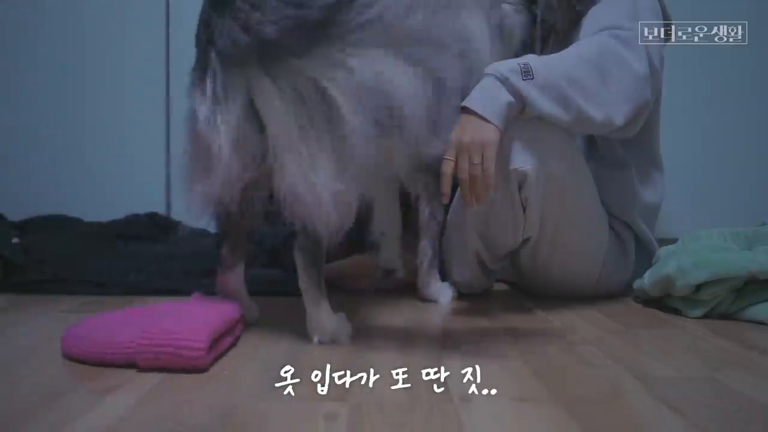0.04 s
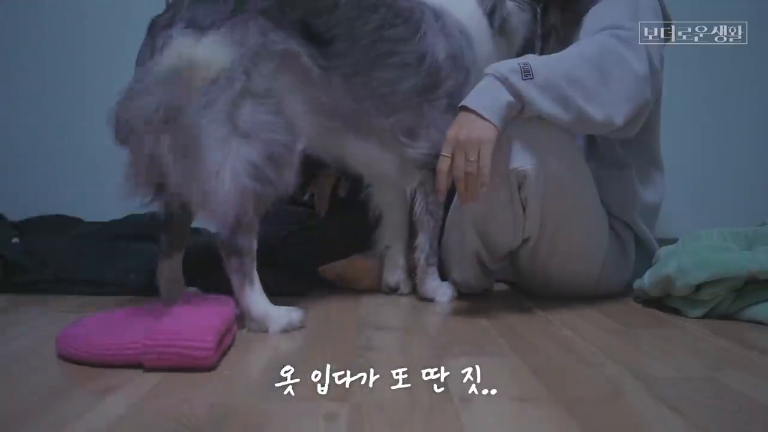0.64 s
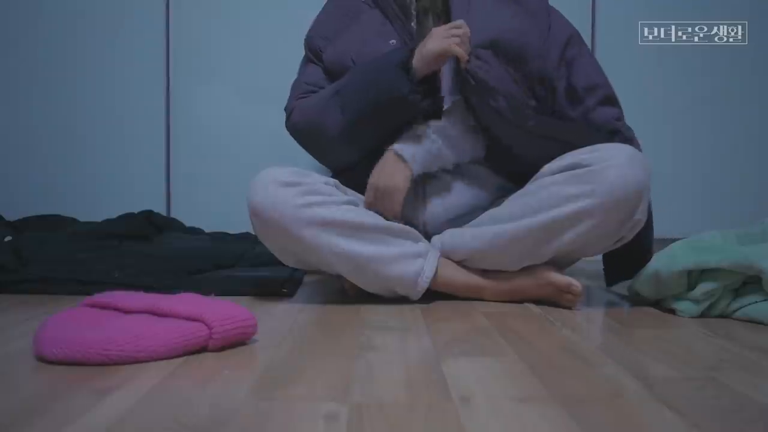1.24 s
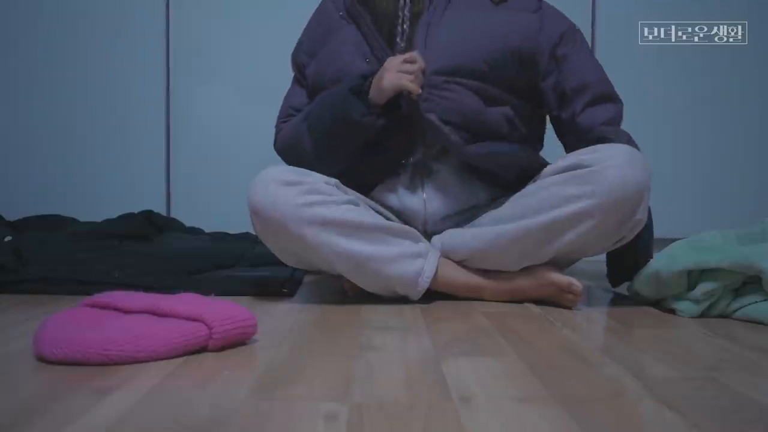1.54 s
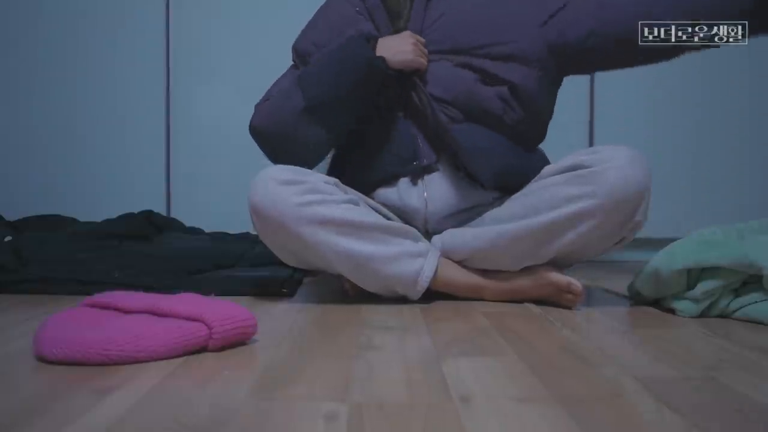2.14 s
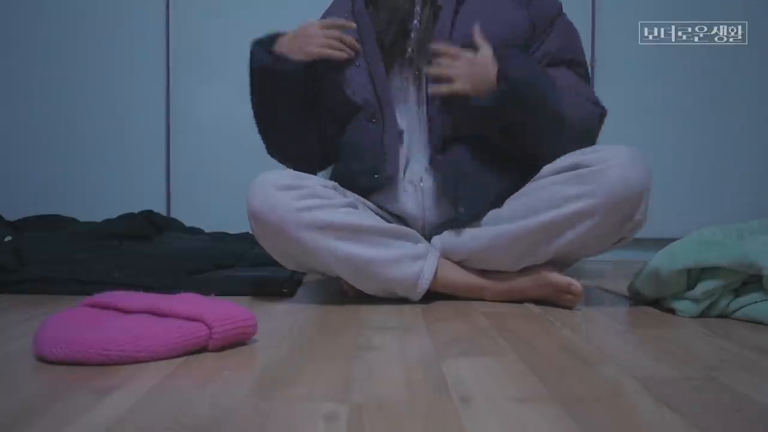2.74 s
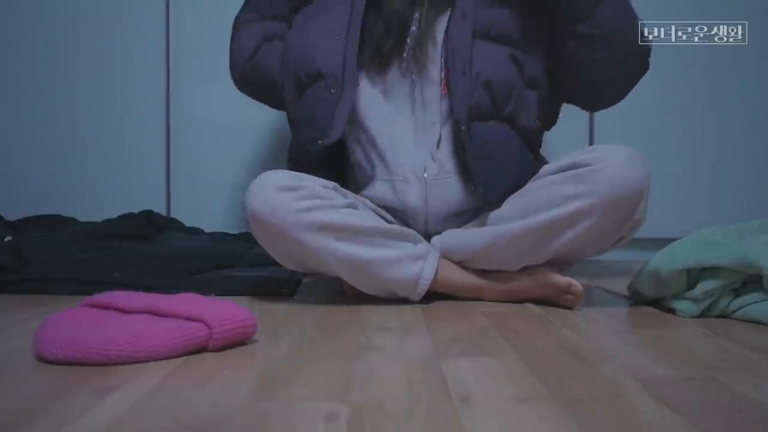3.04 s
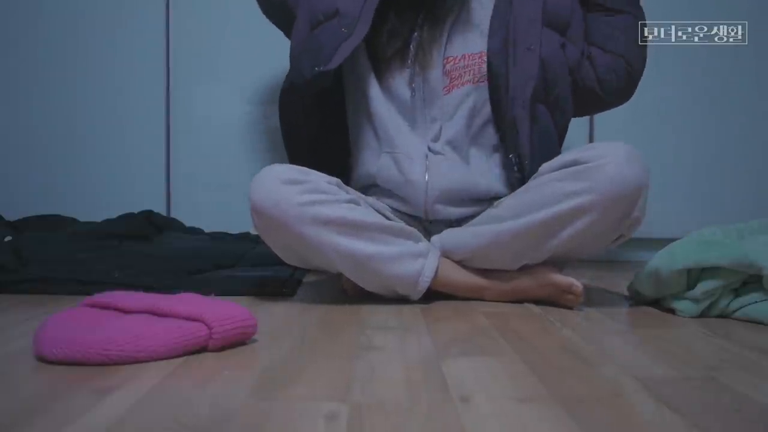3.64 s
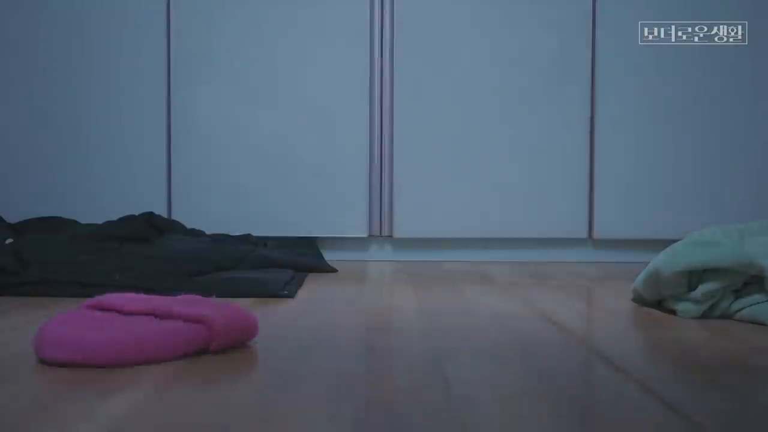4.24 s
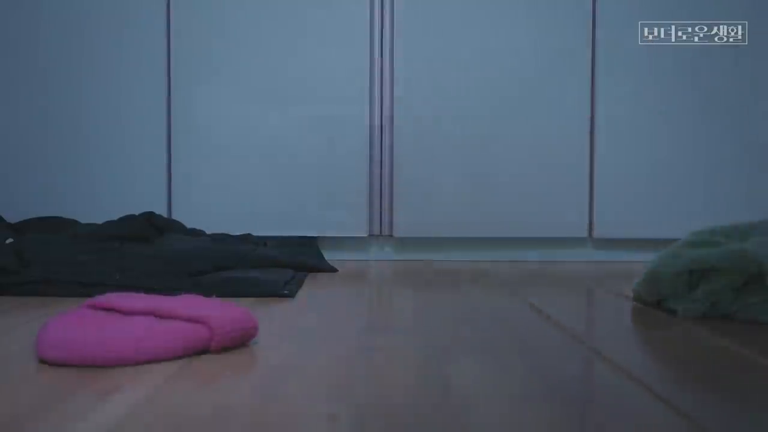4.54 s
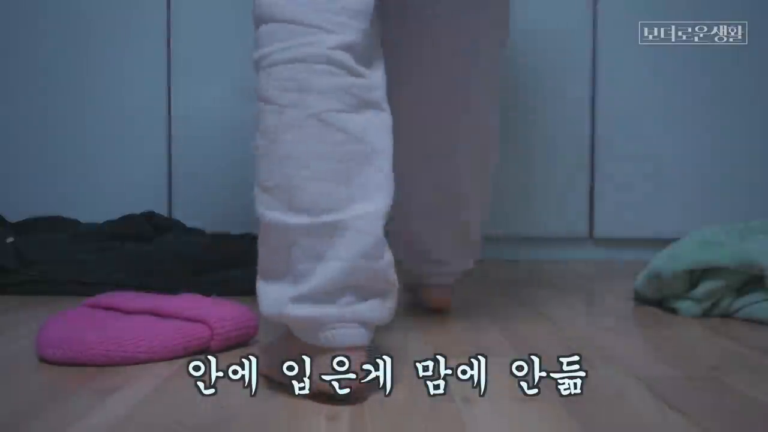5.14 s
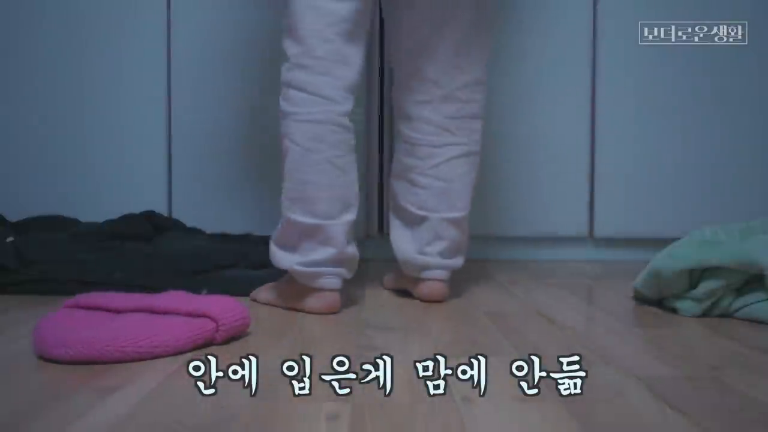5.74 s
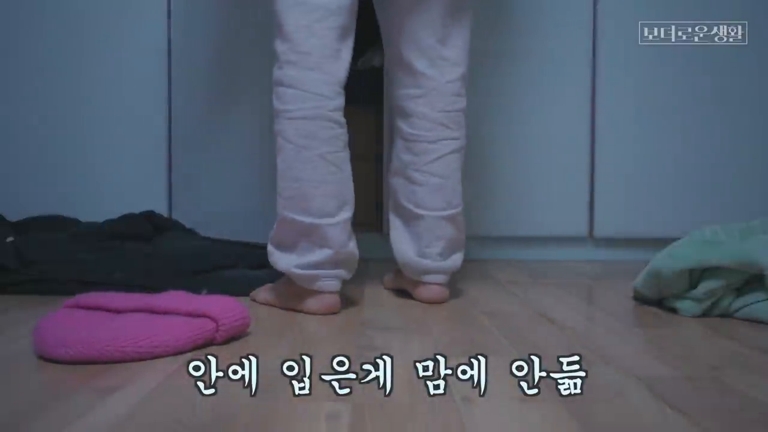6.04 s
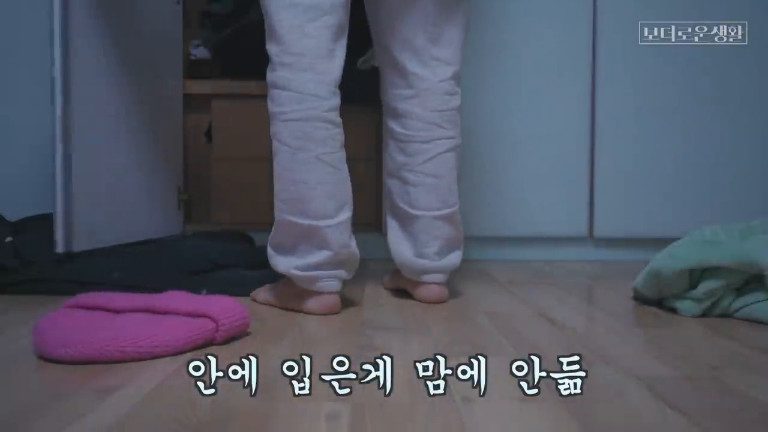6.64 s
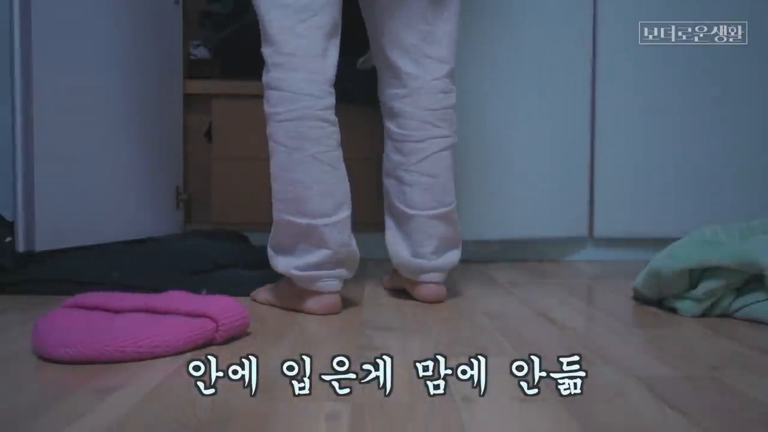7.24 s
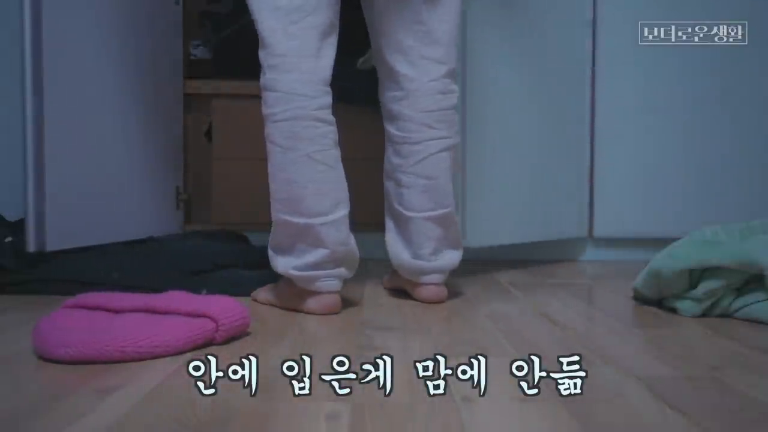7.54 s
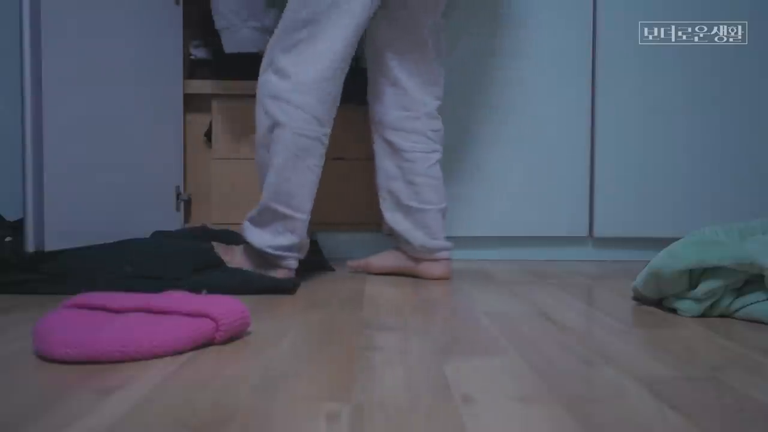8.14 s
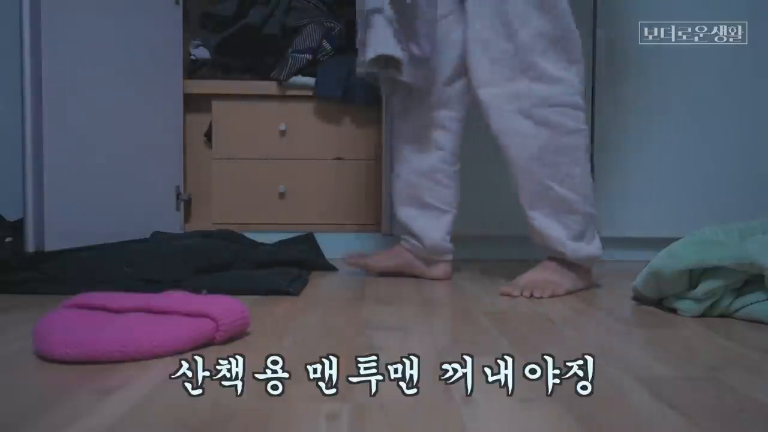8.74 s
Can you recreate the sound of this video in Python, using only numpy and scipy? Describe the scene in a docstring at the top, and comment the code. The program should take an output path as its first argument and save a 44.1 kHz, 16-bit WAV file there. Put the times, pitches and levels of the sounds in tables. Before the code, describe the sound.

For the first second, a dog's claws tick on a wooden floor, two clicks standing out sharply over faint paw bumps. At about 1.1 seconds the sound cuts to someone pulling on a padded nylon jacket close by: repeated hissing swishes with a thin, zippy edge, crumpling folds and soft puffs of padding, easing off after 3 seconds. From about 4.3 to 5.5 seconds bare feet pass the microphone, with dull bumps, a couple of heel knocks on the boards and small clicks amid the rustle. Softer strokes of cloth continue from 6 to 7.5 seconds as the person reaches into a wardrobe. Around 7.8 seconds louder rummaging begins, peaking near 8.3 seconds, with light wooden knocks, snapping fabric and a click near 8.6 seconds. The small bedroom adds a short echo, with faint room tone underneath.

```python
"""A dog's claws tick on a wooden floor in a small bedroom, over soft bumps of its paws. Then someone
pulls on a padded nylon jacket, walks past the microphone to a wardrobe and takes clothes out, each moment
cutting abruptly to the next. The nylon hisses and sings as it rubs, its folds crumple and snap, and the
padding puffs. Bare feet bump, wood knocks, and the walls add a short echo over faint room tone."""
import sys
import numpy as np
from scipy import signal
from scipy.fft import rfft, irfft
from scipy.io import wavfile
from scipy.ndimage import map_coordinates

SR = 44100
rng = np.random.default_rng(int(sys.argv[2]) if len(sys.argv) > 2 else 0)


def log_audio(samples):
    """Write samples as a 16-bit WAV file to the path given in sys.argv[1]."""
    # one column per channel
    frames = np.atleast_2d(samples).T
    # limit to full scale, then quantise
    limited = np.clip(frames, -1, 1)
    pcm = np.round(limited * 32767).astype(np.int16)
    wavfile.write(sys.argv[1], SR, pcm)


N = 387815
TIME = np.arange(N) / SR
PART_STARTS_S = (1.112, 3.902, 7.729)  # dressing, walking, rummaging
PADDING_STIR_DB = (-15, -29, -24)  # padding stirred by the strokes in those parts, relative to the rubbing
JACKET_ON = TIME >= PART_STARTS_S[0]

# Tone of the quiet room. Each row: frequency in Hz, relative level in dB.
ROOM_TONE_EQ = [(25, -28), (80, -14), (160, -7.5), (350, -10), (600, -2), (1200, 1.5), (2500, -2),
                (6000, -2.5), (15500, -4.5)]
# Decay of the walls' echo. Each row: frequency in Hz, seconds to fall 60 dB.
ECHO_DECAY = [(200, 0.4), (600, 0.42), (1500, 0.37), (4000, 0.23), (12000, 0.21)]
# Stereo width of the echo. Each row: frequency in Hz, share of power in the side signal from 0 to 1.
ECHO_WIDTH = [(100, 0.02), (400, 0.2), (1200, 0.25), (2200, 0.61), (12000, 0.66)]
# Standing waves of the room. Each row: frequency in Hz, bandwidth in Hz, gain in dB.
ROOM_NOTES = [(124, 14, -11), (199, 16, -11), (443, 25, -12), (672, 22, -12), (1137, 30, -11)]
# Soft bumps of paws, bare feet and the jacket's weight.
# Each row: peak time in seconds, level in dB, decay in seconds, pitch in Hz.
SOFT_BUMPS = [(.312, -61, .064, 640), (.355, -57, .03, 680), (.528, -63, .012, 480), (.59, -54, 0.021, 503),
              (.84, -59, .067, 520), (1.85, -59, .06, 150), (2.615, -44, 0.037, 270),
              (2.64, -40.5, 0.022, 650), (4.344, -47, .028, 420), (4.38, -35, .016, 420),
              (4.389, -32, .009, 1120), (4.76, -45, .012, 480), (4.831, -45.5, 0.055, 430),
              (4.835, -70, .055, 109), (5.261, -48.5, .037, 550), (5.58, -65.5, 0.084, 170),
              (6.09, -66, .04, 260), (7.13, -74, 0.065, 190), (8.64, -50, .04, 520)]
# Paw pads on varnish. Each row: peak time in seconds, level in dB, decay in seconds, pitch in Hz.
PAW_SQUEAKS = [(.365, -56, .025, 1030), (1.015, -57, .025, 1120)]
# A heel on the boards, or things in the wardrobe.
# Each row: start in seconds, strength in dB, treble cutoff in Hz.
WOOD_KNOCKS = [(4.3903, -7, 900), (4.83, -4, 5500), (4.8338, -9.5, 2300), (7.832, -14, 9000),
               (8.2585, -10, 7000), (8.27, -10, 2500)]
# Tone of struck wood. Each row: frequency in Hz, relative level in dB.
WOOD_EQ = [(60, -42), (200, -19), (450, -1), (800, -1), (1400, -4), (2500, 5), (4000, -1), (6500, -2),
           (15000, -5)]
# Claws and other hard little contacts. Each row: peak time in seconds, level in dB, attack and decay in
# seconds, share that is one clean blow from 0 to 1, relative scrape level in dB, left minus right in dB.
HARD_TICKS = [(.009, -37, .0005, 0.0035, .4, -21, 1), (.029, -39.5, 0.011, .0086, 0, -20, 2),
              (.1304, -15.3, .0007, .0013, .85, -13.5, -1), (.277, -37.5, .0036, 0.0034, 0, -22, 1),
              (.311, -30, .0005, 0.0091, .3, -10, 2), (.448, -47, .002, 0.009, .1, -13, 4),
              (.528, -54, .001, .012, 0, -2, 1), (.594, -43, .017, .012, 0, -3.5, 2),
              (.743, -44.5, 0.005, 0.015, 0, -10, 1), (0.8377, -15.7, 0.00018, .0018, .85, -9.5, 2.5),
              (5.2789, -27.5, .0009, .0012, .8, -22, -2.5), (5.423, -31, 0.0022, .0015, .5, -17, 2),
              (5.707, -44, .003, .003, 0, -10, 2), (8.624, -36, .001, .003, .3, -5, -2),
              (8.636, -28, 0.0022, .0079, 0, -10, -4)]
# The ring of a tick. Each row: frequency in Hz, bandwidth in Hz, relative level in dB.
TICK_RING = [(600, 400, -21), (1100, 500, -24), (1900, 800, -15), (3600, 950, 0), (4980, 1100, -8),
             (6880, 600, -11.5), (8550, 800, -18)]
# Tones of rubbing nylon, crumpling folds and padding. Each row: frequency in Hz, relative level in dB.
NYLON_EQ = [(300, -29.5), (1200, -7.5), (3000, -3.5), (5000, -1), (7000, 1), (10000, 1), (15500, 1.5)]
FOLDS_EQ = [(100, -41), (300, -15.5), (500, -8), (720, 1), (1100, -0.5), (1600, 1), (3000, 1), (5000, -5),
            (12000, -37)]
PADDING_EQ = [(25, -50), (60, -54), (110, -23), (200, -6.5), (290, 1.5), (450, 2.5), (900, -4),
              (3000, -23.5)]
# Registers of the rustle that swell separately. Each entry: a crossover frequency in Hz.
CREASE_CROSSOVERS = (500, 1000, 1800, 3000, 5000, 8500)
# Folds pulled taut. Each row: peak time in seconds, level in dB, attack and decay in seconds,
# relative level of the air slap in dB.
FOLD_SNAPS = [(1.113, -40, .0011, 0.036, -17), (1.684, -48, .0008, .0046, 9),
              (1.76, -40.5, .0024, 0.022, -12), (2.645, -34, 0.036, 0.028, -5),
              (3.29, -37.5, 0.0081, 0.03, -8.5), (4.227, -35.5, .012, 0.031, -9),
              (4.38, -39, 0.018, 0.022, -6), (4.553, -41.5, .0012, .0092, 0),
              (4.761, -25, 0.0013, .0012, -7), (4.831, -29, 0.0006, .008, -10),
              (5.281, -52, 0.0018, 0.0056, 10), (5.42, -35, .0058, .002, -5.5),
              (5.485, -40.5, .0004, 0.017, -5), (8.263, -27, .024, 0.018, -3),
              (8.637, -30, 0.0062, 0.028, -5), (8.736, -40, 0.00084, .04, -7)]
# Nylon sliding over nylon, its weave singing. Each row: midpoint in seconds, half length in seconds,
# pitch in Hz, glide in octaves per second, level in dB.
WEAVE_SWISHES = [(1.16, 0.07, 3300, 0, -51), (1.342, .013, 5760, 1, -37.5), (1.395, .04, 6100, 1.5, -37),
                 (1.392, 0.05, 13000, 0, -35), (1.615, 0.05, 2704, 2, -51.5), (1.85, .06, 2100, 4, -52),
                 (2.17, 0.09, 2800, 0, -44.5), (2.45, 0.036, 2634, -5.5, -44.5), (2.76, .03, 5000, -2, -44),
                 (2.83, .05, 2500, -3, -48), (2.88, 0.031, 1534, -1.5, -46), (4.39, .002, 11000, 0, -27),
                 (4.761, .002, 13000, 0, -24), (5.15, 0.023, 7570, -0.5, -40),
                 (5.21, 0.051, 3890, -1.5, -44), (7.8, .055, 2700, 0, -43), (8.25, 0.1, 5220, 0, -47)]
# Padding pressed flat, puffing out air. Each row: peak time in seconds, length in seconds, level in dB.
PADDING_PUFFS = [(1.13, .04, -55), (1.41, .09, -47), (1.66, 0.095, -45.5), (1.81, 0.12, -42),
                 (2.64, .04, -42), (3.25, 0.077, -54), (5.95, .16, -62), (6.45, .08, -58.5),
                 (8.754, 0.045, -47)]
# Cloth over cloth: arms into sleeves, sleeves brushing the body, reaching for the wardrobe, rummaging.
# Each row: fastest moment in seconds, length in seconds, rubbing level in dB, relative level of the
# folds in dB, share heard by way of the walls from 0 to 1.
CLOTH_STROKES = [ (1.121, 0.11, -42, -5, 0.43), (1.395, .115, -35.3, -13, 0.12),
                 (1.603, 0.11, -42.5, -2, 0.36), (1.852, 0.22, -42, 1.5, 0.46), (2.09, 0.15, -39, -3, .22),
                 (2.22, 0.13, -38.5, -3.5, 0.26), (2.35, .05, -45, -8, .3),
                 (2.454, 0.12, -39.7, -1.5, 0.32), (2.691, .12, -36.5, -5.5, .32),
                 (2.96, 0.39, -38.5, -5.5, 0.29), (3.46, .4, -46.5, -2, 0.47),
                 (3.89, 0.096, -50.5, -7, 0.4), (4.02, 0.2, -49, 1, 0.5), (4.27, .3, -38.5, -3, 0.59),
                 (4.62, .15, -43, 0, 0.56), (4.82, .16, -37.5, -5, 0.58), (5.05, 0.086, -39.5, -9.5, 0.56),
                 (5.155, 0.094, -38, -16, 0.3), (5.362, .19, -45.5, 0.5, 0.52),
                 (5.815, .28, -45, -3.5, 0.57), (6.166, 0.22, -41.3, -7.5, 0.5),
                 (6.44, 0.15, -41.5, -7.5, 0.5), (6.59, .1, -44, -8, .5), (7.0, .13, -45, -15, 0.51),
                 (7.142, 0.15, -48.5, -2, .54), (7.467, 0.25, -46.3, -2, .53), (7.607, 0.054, -51, -3, 0.4),
                 (7.775, .34, -36.5, -1.3, 0.51), (8.2, 0.22, -34.5, -5, 0.33),
                 (8.335, .11, -32.5, -10.5, 0.06), (8.441, 0.097, -35, -10.5, 0.17),
                 (8.742, 0.22, -43, 1, 0.64)]
# Where the wearer is. Each row: time in seconds, left minus right in dB.
WEARER_PAN = [(1.2, -1), (2.6, -1.5), (3.0, 0), (3.8, -1.2), (4.05, -3.7), (4.8, -2.2), (5.1, .2),
              (5.7, -.5), (6.2, 1.3), (7.0, 1.4), (7.45, -2.5), (8.1, .7), (8.7, -3)]


def undb(db):
    """Decibels to gain."""
    return 10 ** (np.asarray(db) / 20)


def unit(x):
    """Scale to an rms of 1."""
    return x / np.sqrt(np.mean(x ** 2))


def on_log_axis(hz, points):
    """Read (Hz, value) points on a log-frequency axis."""
    f, value = np.transpose(points)
    return np.interp(np.log(np.maximum(hz, 1)), np.log(f), value)


def rolloff(x, hz, kind, order):
    """Butterworth low-pass or high-pass."""
    return signal.sosfilt(signal.butter(order, hz, kind, fs=SR, output="sos"), x)


def colour(x, eq, size=2048):
    """Minimum-phase EQ through (Hz, dB) points; white noise keeps its power."""
    gain = unit(undb(on_log_axis(np.linspace(0, SR / 2, size // 2 + 1), eq)))
    cepstrum = irfft(np.log(gain))
    cepstrum[1:size // 2] *= 2
    cepstrum[size // 2 + 1:] = 0
    return signal.oaconvolve(x, irfft(np.exp(rfft(cepstrum))))[:len(x)]


def resonate(x, hz, width_hz):
    """One resonance, gain 1 at its centre."""
    return signal.lfilter(*signal.iirpeak(hz, hz / width_hz, fs=SR), x)


def resonate_twice(x, hz, width_hz):
    """A resonance with steeper skirts that takes a moment to swell."""
    return resonate(resonate(x, hz, width_hz), hz, width_hz)


def wander(per_s):
    """A slow random drift with a spread near 1."""
    points = rng.standard_normal(4096)
    return np.interp(TIME * per_s, np.arange(len(points)), points)


def burst(s, attack, decay):
    """Envelope that builds up to time s and dies away."""
    out = np.full(N, 1e-18)
    near = slice(*np.searchsorted(TIME, [s - 20 * attack, s + 20 * decay]))
    t = TIME[near] - s
    out[near] = np.exp(-np.abs(t) / np.where(t < 0, attack, decay))
    return out


def delay(x, lag_s):
    """Delay by a time that may drift."""
    return map_coordinates(x, [np.arange(N) - lag_s * SR], order=3)


def room_tone(level_db=-63):
    """A faint bed of room noise and microphone hiss, its bass centred."""
    mid, side = (colour(rng.standard_normal(N), ROOM_TONE_EQ) for _ in range(2))
    side = rolloff(side, 400, "high", order=1)
    return undb(level_db) * np.array([mid + side, mid - side])


def standing_waves(x):
    """The small room lifts a few low notes of whatever sounds in it."""
    return x + sum(undb(db) * resonate(x, hz, width) for hz, width, db in ROOM_NOTES)


def wall_echo(x, size=16384):
    """A small room's tail: it dies band by band, narrow in the bass and wide on top."""
    t, hz = TIME[:size], np.linspace(0, SR / 2, size // 2 + 1)
    noise, tail = rfft(rng.standard_normal((2, size))), 0
    onset = np.clip(t / .002 - .5, 0, 1)
    for k, (_, t60) in enumerate(ECHO_DECAY):
        band = on_log_axis(hz, [(f, j == k) for j, (f, _) in enumerate(ECHO_DECAY)])
        fade = np.exp(-np.log(1000) * t / t60) * onset
        tail = tail + irfft(noise * band) * fade / np.linalg.norm(fade)
    width = on_log_axis(hz, ECHO_WIDTH)
    mid, side = irfft(rfft(tail) * np.sqrt([1 - width, width]))
    return np.array([signal.oaconvolve(x, h)[:N] for h in (mid + side, mid - side)])


def moving_echo(x, turns_per_s):
    """As a body moves, its echo keeps crossfading from one set of wall paths to others."""
    angle = 2 * np.pi * turns_per_s * TIME + wander(3)
    weights = np.cos(angle), np.sin(angle), np.cos(angle * np.sqrt(3)), np.sin(angle * np.sqrt(3))
    return sum(wall_echo(x * w) for w in weights) / np.sqrt(2)


def floor_bounce(x, lag_s=.00094, bounce_db=-14):
    """The microphone stands low: a bounce off the boards combs the sound, shifting as the body moves."""
    bounce = delay(x, lag_s * (1 + .078 * wander(3)))
    return (x + undb(bounce_db) * bounce) / np.hypot(1, undb(bounce_db))


def place(x, pan_db, lag_s_per_db=1.2e-5, scatter_db=-6.5):
    """Pan a sharp sound: louder and earlier on its own side, widened by scatter off nearby furniture."""
    sides_db = pan_db / 2, -pan_db / 2
    panned = np.array([delay(x, -lag_s_per_db * db) * undb(db) for db in sides_db])
    scatter = rng.standard_normal(512) * np.exp(-TIME[:512] / .0015)
    scatter = rolloff(scatter / np.linalg.norm(scatter), 1200, "high", order=1)
    return panned + undb(scatter_db) * signal.oaconvolve(x, scatter)[:N] * np.array([[1], [-1]])


def paw_squeaks():
    """A paw pad sticks and slips on the varnish at a nearly steady rate."""
    out = 0
    for s, db, decay, hz in PAW_SQUEAKS:
        squeak = unit(resonate_twice(rng.standard_normal(N), hz, hz * .15))
        out += squeak * undb(db) * burst(s, .008, decay)
    return out


def soft_bumps():
    """A soft weight lands with a dull, heavily damped bump."""
    out = 0
    for s, db, decay, hz in SOFT_BUMPS:
        boards = unit(resonate_twice(rng.standard_normal(SR), hz, hz * .6))
        out += np.resize(boards, N) * undb(db) * burst(s, .0026, decay)
    return out


def wood_knocks():
    """One short push into wood; the softer the contact, the duller the knock."""
    out = np.zeros(N)
    for s, db, cutoff_hz in WOOD_KNOCKS:
        push = rolloff(signal.unit_impulse(2048), cutoff_hz, "low", order=2)
        knock, start = colour(push, WOOD_EQ), int(s * SR)
        out[start:start + len(knock)] += undb(db) * knock / np.linalg.norm(knock)
    return out


def hard_ticks():
    """A claw or other hard tip lands in one blow or skids; returns its brief ring and its dry scrape."""
    blow, skid, scrape_level = np.zeros((3, N))
    for s, db, attack, decay, clean, scrape_db, _ in HARD_TICKS:
        touch = undb(db) * burst(s, attack, decay)
        blow[int(s * SR)] = np.sqrt(clean * np.sum(touch ** 2))
        skid += np.sqrt(1 - clean) * touch
        scrape_level += undb(scrape_db) * touch
    contact = blow + skid * np.sign(rng.standard_normal(N))
    tap = signal.unit_impulse(1024)
    body = sum(undb(db) * resonate_twice(tap, hz, width) for hz, width, db in TICK_RING)
    ring = signal.oaconvolve(contact, body / np.linalg.norm(body))[:N]
    scrape_eq = [(500, -5), (1200, -7), (2500, -1.5), (6000, 0), (9000, 4), (15000, 1)]
    scrape = colour(scrape_level * rng.standard_normal(N), scrape_eq)
    return ring, rolloff(scrape, 600, "high", order=3)


def fold_snaps():
    """A fold tightens and snaps: a bright crack over the soft slap of the air it pushes."""
    crack, slap = np.zeros((2, N))
    for s, db, attack, decay, slap_db in FOLD_SNAPS:
        envelope = undb(db) * burst(s, attack, decay)
        crack += envelope
        slap += undb(slap_db) * envelope
    bright = [(200, -46), (900, -12), (2500, -.5), (6000, -5), (15000, -6)]
    soft = [(30, -59), (100, -22), (220, -13.5), (420, 7), (750, 10), (1400, 8.5), (4000, -7),
            (12000, -57)]
    return colour(crack * rng.standard_normal(N), bright) + colour(slap * rng.standard_normal(N), soft)


def weave_swishes(pitch_spread=.15):
    """Threads skip over each other at an uneven rate that follows the speed of the slide."""
    out = np.zeros(N)
    for s, half, hz, glide, db in WEAVE_SWISHES:
        near = slice(*np.searchsorted(TIME, [s - 2 * half, s + 2 * half]))
        t = TIME[near] - s
        thread_hz = hz * 2 ** (glide * t)
        tone = np.sqrt(2) * np.cos(2 * np.pi * np.cumsum(thread_hz) / SR)
        roughness = unit(rolloff(rng.standard_normal(SR), hz * pitch_spread, "low", order=2))[:len(t)]
        envelope = undb(db) * np.exp(-(t / half) ** 8 / 2)
        out[near] += envelope * roughness * tone
    return out * JACKET_ON


def swell(t, s, length, taper=1.545):
    """A limb speeds up and slows again: a bell around time s, about 9 dB down one length away."""
    return (1 + ((t - s) / length) ** 2) ** -taper


def movement():
    """Strokes add in power, the strongest setting the character; returns three dB curves and wall share."""
    t = TIME[::32]
    part = np.searchsorted(PART_STARTS_S, t)
    # a stroke is cut off at the edges of its own part
    power = np.array([(undb(db) * swell(t, s, length)) ** 2 * (part == np.searchsorted(PART_STARTS_S, s))
                      for s, length, db, _, _ in CLOTH_STROKES])
    rubbing = power.sum(axis=0) + 1e-12
    *_, folds_db, wall_share = np.transpose(CLOTH_STROKES)
    # folds and padding are relative to the rubbing
    folds = undb(folds_db) ** 2 @ power / rubbing
    puffs = sum((undb(db) * swell(t, s, length)) ** 2 for s, length, db in PADDING_PUFFS) * (part > 0)
    padding = undb(PADDING_STIR_DB)[np.maximum(part - 1, 0)] ** 2 + puffs / rubbing
    levels_db = 10 * np.log10(np.array([rubbing, folds, padding]) + 1e-12)
    return [np.interp(TIME, t, curve) for curve in (*levels_db, wall_share @ power / rubbing)]


def slips(per_s, pace, spread_db):
    """Tiny stick-slip releases of random size, about pace * per_s a second; rms 1 at a pace of 1."""
    happens = rng.random(N) < pace * per_s / SR
    size_db = spread_db * np.clip(rng.standard_normal(N), -2, 2)
    return happens * unit(rng.standard_normal(N) * undb(size_db)) * np.sqrt(SR / per_s)


def creases(x, depth_db, per_s):
    """Creases of every size open and close, so each register swells on its own."""
    out, below = 0, 0
    for hz in CREASE_CROSSOVERS:
        low = signal.sosfiltfilt(signal.butter(2, hz, fs=SR, output="sos"), x)
        out += (low - below) * undb(depth_db * wander(per_s))
        below = low
    return out + x - below


def jacket_rustle(rub_db, folds_db, padding_db):
    """Rubbing nylon hisses in dense slips and sparse crinkles; folds buckle; the padding puffs below."""
    pace = undb(.7 * (rub_db + 42))  # harder rubbing packs the slips closer together
    friction = slips(12000, pace, spread_db=0)
    crinkles = undb(-12) * slips(120, pace, spread_db=.5)
    # each layer gets a trim and a flutter of its own, in dB
    hiss = colour(friction + crinkles, NYLON_EQ) * undb(1.7 + .78 * wander(60))
    folds = colour(slips(3000, pace, spread_db=1), FOLDS_EQ) * undb(folds_db - 1.7 + 1.4 * wander(45))
    padding = colour(slips(1200, pace, spread_db=4), PADDING_EQ)
    padding *= undb(padding_db - 3.5 + 1.5 * wander(30))
    return creases(hiss + folds + padding, depth_db=1.23, per_s=14) * undb(rub_db) * JACKET_ON


def scene():
    """The stereo mix; cloth turned away from the microphone is heard mostly by way of the walls."""
    rub_db, folds_db, padding_db, wall_share = movement()
    pan_db = np.interp(TIME, *np.transpose(WEARER_PAN)) * JACKET_ON
    tick_s, *_, tick_pan_db = np.transpose(HARD_TICKS)
    cloth = jacket_rustle(rub_db, folds_db, padding_db) + weave_swishes()
    hits = fold_snaps() + wood_knocks()
    ring, scrape = hard_ticks()
    feet = soft_bumps() + paw_squeaks()
    direct = np.sqrt(1 - wall_share) * floor_bounce(cloth) + feet
    sharp = place(ring + scrape, np.interp(TIME, tick_s, tick_pan_db)) + place(hits, pan_db)
    echo_send = (np.sqrt(wall_share) * cloth + undb(-10.5) * hits + undb(-7.5) * ring
                 + undb(4) * scrape + undb(-11.5) * feet)
    echo = moving_echo(echo_send, turns_per_s=2.5)
    panned = (direct + echo) * undb(np.array([pan_db, -pan_db]) / 2)
    dip = 1 - 1.1 * burst(3.9, attack=.002, decay=.009)  # the level dips briefly where the scene changes to the walk
    return standing_waves(panned + sharp) * dip + room_tone()


def record(dry):
    """The recorder thins the deep bass and cuts the top steeply."""
    thin = rolloff(dry, 70, "high", order=1)
    return signal.sosfilt(signal.ellip(12, .1, 80, 15800, fs=SR, output="sos"), thin)


dry = scene()
out = record(dry)
log_audio(out)
```